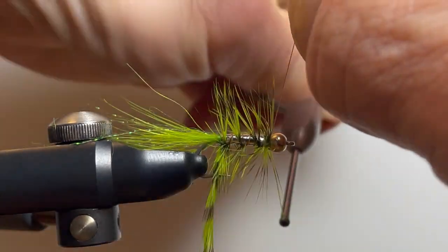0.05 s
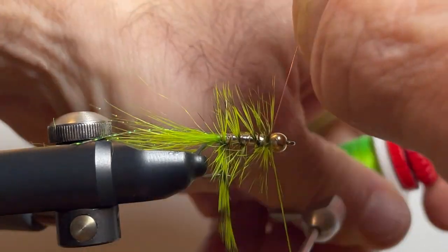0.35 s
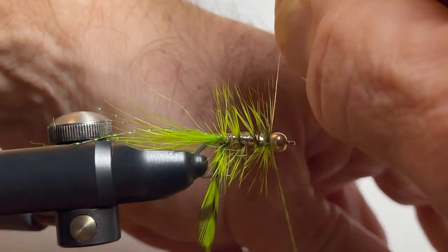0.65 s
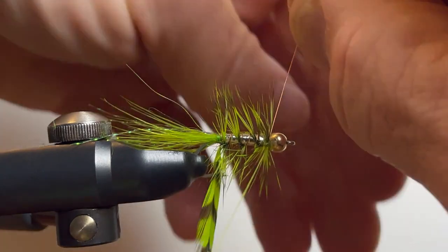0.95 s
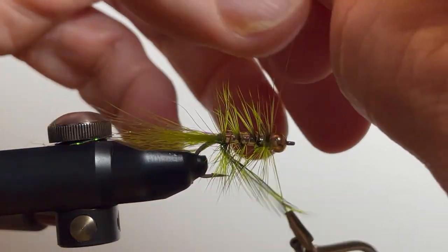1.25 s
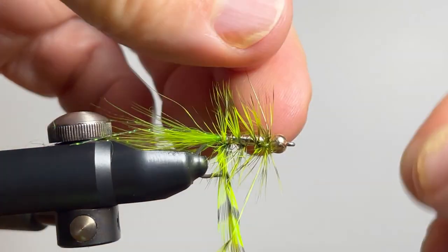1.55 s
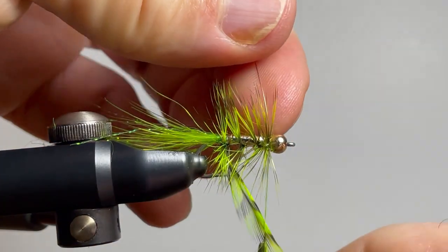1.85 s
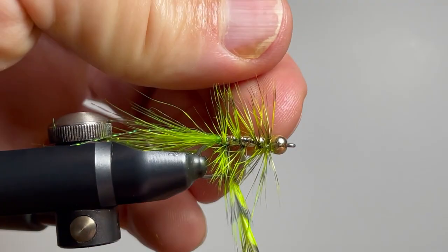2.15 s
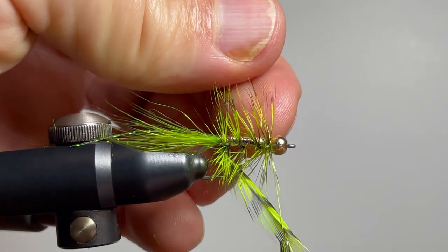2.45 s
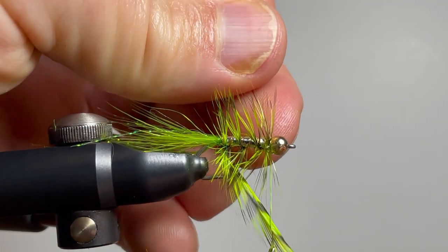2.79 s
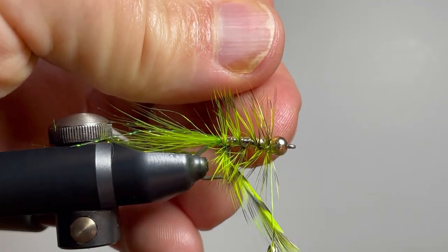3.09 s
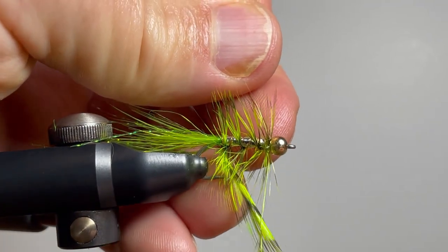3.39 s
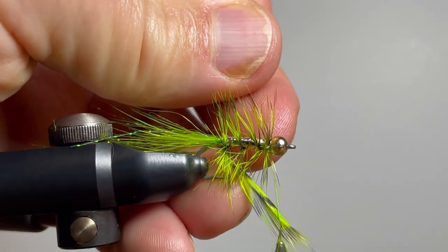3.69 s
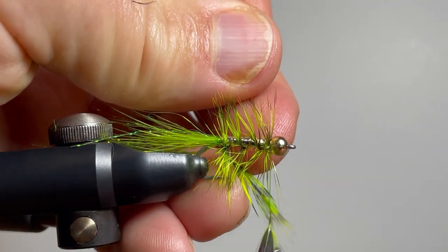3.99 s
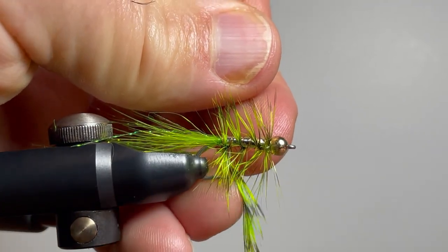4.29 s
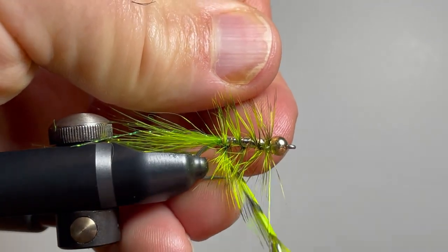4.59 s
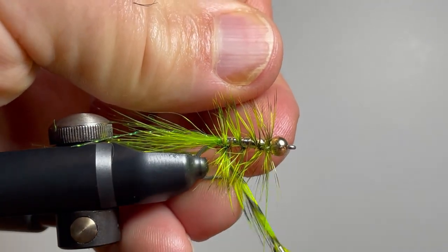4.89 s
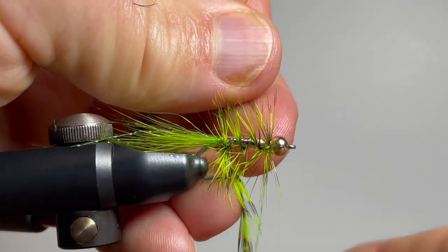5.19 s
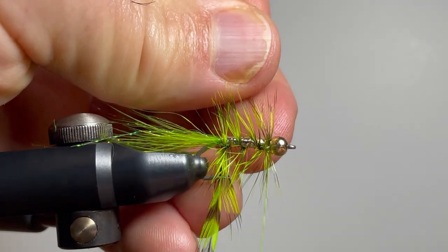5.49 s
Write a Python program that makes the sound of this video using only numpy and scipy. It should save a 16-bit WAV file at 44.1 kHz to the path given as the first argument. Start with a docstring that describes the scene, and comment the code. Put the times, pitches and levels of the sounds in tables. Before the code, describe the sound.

Light, irregular metal ticks and brief scratches come from little pliers knocking against fingers and a vise during fly tying. The jaws clink and the spring sings thinly, while the hand makes a few dull bumps. The handling pauses for about a second midway, then resumes with more clicks, scrapes and clinks. The close stereo microphone also picks up the quiet room's steady low rumble and slight hiss.

```python
"""Small, dry metal ticks and scrapes, close up: steel pliers wind a feather round a fly hook in a vise.
Each touch on fingers or vise is a burst of friction noise that rings the tool's damped resonances.
The jaws clink, and the spring loop sings while the pliers swing free, until a finger catches them.
The hand nudges the vise into soft thuds and brushes the feather once. Two closely spaced microphone
ports hear it all in a quiet room, over a low rumble and a faint hiss."""
import sys
import numpy as np
from scipy import signal
from scipy.fft import rfft, irfft, next_fast_len
from scipy.io import wavfile
from scipy.ndimage import uniform_filter1d

SR = 44100
rng = np.random.default_rng(int(sys.argv[2]) if len(sys.argv) > 2 else 0)


def log_audio(samples):
    """Write samples as a 16-bit WAV file to the path given in sys.argv[1]."""
    # one column per channel
    frames = np.atleast_2d(samples).T
    # limit to full scale, then quantise
    limited = np.clip(frames, -1, 1)
    pcm = np.round(limited * 32767).astype(np.int16)
    wavfile.write(sys.argv[1], SR, pcm)


N = 244490

# dry hits of the pliers: t/s, strength/dB, ping over strength/dB, favoured knock f/Hz, bounce count
TICKS = [(0.776, -31, -1.5, 3000, 0), (0.942, -67, -7, 2200, 0), (1.043, -65.5, -19, 2300, 0),
         (1.09, -42, -7.5, 2200, 0), (1.114, -35.5, -18, 2500, 0), (1.12, -37, 0.5, 3590, 0),
         (1.144, -35, -6, 2270, 0), (1.164, -42.5, 4.5, 2630, 0), (1.205, -47.5, 3, 3405, 0),
         (1.233, -52, 5, 3575, 0), (1.267, -47.5, -12, 3500, 1), (1.505, -45, -5.5, 2674, 0),
         (1.542, -49.5, 4, 3630, 0), (1.678, -62, -16.5, 2387, 0), (1.782, -45.5, -1, 2287, 2),
         (1.8205, -32, 7, 2297, 2), (1.845, -40, 10, 1665, 1), (1.935, -51.5, 2, 3380, 0),
         (2.089, -45, 4, 2140, 0), (2.106, -42.5, -3, 1940, 0), (2.274, -42, 8.5, 1958, 2),
         (2.299, -40.5, 3.5, 1953, 0), (2.342, -37, -27, 2080, 0), (2.366, -44.5, -19, 2090, 0),
         (2.579, -67, -28, 1710, 0), (2.839, -61.5, -17, 2400, 0), (2.858, -59.5, -3.5, 2200, 0),
         (3.782, -44.5, -8.5, 2600, 0), (4.16, -46.5, -6, 2114, 0), (4.17, -42.5, -5, 3200, 0),
         (4.188, -41.5, -11, 2115, 0), (4.237, -43.5, -13, 2500, 0), (4.328, -30, -6, 3210, 0),
         (4.439, -38.5, -6, 1840, 0), (4.47, -46, 5, 1800, 0), (4.541, -48, -2, 1920, 0),
         (4.604, -59, -7, 1995, 0), (4.68, -48.5, -14, 2380, 0), (4.721, -40.5, 11, 3540, 0),
         (4.737, -41.5, 11, 1853, 2), (4.773, -42.5, -6, 1940, 0), (5.09, -46.5, -13.5, 2120, 0),
         (5.128, -46.5, -5, 2590, 0), (5.1441, -32, 4.5, 4090, 0), (5.171, -48.5, 6.5, 1790, 0),
         (5.279, -43.5, -0.5, 1880, 0), (5.503, -30.5, -9, 2040, 0), (5.516, -44.5, 0.5, 3760, 0)]
# scrapes, and the 4.4 kHz ping ringing on after the hard hits near 1.85 s:
# start t/s, end t/s, strength/dB, ping trim/dB
SCRAPES_AND_TAILS = [(1.13, 1.225, -46.5, -11), (1.266, 1.303, -56.5, -17), (1.521, 1.575, -45, -5),
                     (1.791, 1.823, -46, -5.5), (1.844, 1.871, -46.5, 5), (1.873, 1.943, -58, 10),
                     (1.967, 2.016, -62, -4), (2.093, 2.113, -45.5, -1), (2.329, 2.391, -49, -8),
                     (4.161, 4.224, -48.5, -7.5), (4.237, 4.301, -54, -2), (4.4, 4.503, -44.5, -8.5),
                     (4.502, 4.618, -61.5, -2), (4.677, 4.745, -61.5, -19), (5.147, 5.207, -44.5, -5),
                     (5.206, 5.281, -53, -5.5)]
# strikes that ring the jaws: t/s, relative level/dB, share of the free ring time that the grip leaves
CLINKS = [(0.775, -52.5, 1), (1.088, -52.5, .62), (1.168, -45.5, 0.39), (1.506, -55, 0.97), (2.09, -59, 1),
          (2.341, -48, 0.74), (2.858, -71, 0.67), (3.781, -43, 0.95), (4.171, -44.5, 0.92),
          (4.237, -50.5, 1), (4.329, -42.5, 0.54), (5.09, -53, 0.86), (5.128, -45.5, 0.51),
          (5.171, -44, 0.71), (5.277, -51, 0.87), (5.503, -56, 0.61)]
# free swings of the pliers: start t/s, caught t/s, relative level/dB
SWINGS = [(0.773, 1.09, -63.5), (1.173, 1.385, -70), (1.51, 1.7, -65), (5.134, 5.267, -60),
          (5.279, 5.411, -64)]
# hand pushes on the vise: t/s, hold/s, relative level/dB
NUDGES = [(0.801, 0.077, -59.5), (1.102, .1, -48), (1.392, 0.023, -63.5), (1.78, 0.15, -56),
          (1.837, 0.024, -53), (2.03, 0.035, -57), (2.155, 0.18, -64), (2.361, 0.011, -55.5),
          (5.162, 0.052, -57.5)]
# finger on feather: t/s, level/dB
BRUSHES = [(3.958, -67)]
# ringing modes of the steel jaws and of the spring loop: f/Hz, relative level/dB, free t60/s
JAW_MODES = [(2525, -13, .18), (5820, -3, .2), (6670, 0, .24), (6907, -2, .27), (7590, -6, .19),
             (9797, -9, .18), (10095, -9, .34), (11010, -12, .1), (11880, 6, .16), (13340, -13, .14)]
SPRING_MODES = [(3347, 0, 1.05)]
# damped resonances of held tool and vise, in low, middle and high groups: f/Hz, width/Hz, level/dB
KNOCK_MODES = [(437, 71, -2), (1154, 80, -5), (1880, 147, 3), (2114, 53, 9.5), (2370, 370, 3.5),
               (2884, 1400, 0), (3503, 460, 2.5)]
PING_MODES = [(4270, 120, 1.5), (4425, 140, 13), (4569, 302, 9.5), (5130, 470, -1.5)]
SNAP_MODES = [(5740, 520, 3), (6895, 580, 3), (9380, 1400, 2), (10940, 980, 1), (13620, 2400, 1),
              (15100, 1370, -4)]
# noise colours of the bench thud, the room rumble and the hiss: f/Hz, relative level/dB
THUD_SPECTRUM = [(20, -31), (40, -1.5), (80, 9), (125, 3.5), (170, -6.5), (300, -15), (395, -27.5),
                 (434, -4), (490, -33), (700, -20), (1500, -55.5)]
RUMBLE_SPECTRUM = [(12, -57.5), (20, -23.5), (31, -9), (51, -2), (102, -1.5), (127, 0.5), (156, -4.5),
                   (179, -6), (209, -7.5), (240, -6), (356, -16.5), (429, -12), (615, -24), (1200, -35.5),
                   (1560, -66), (2640, -120)]
HISS_SPECTRUM = [(400, -28.5), (1000, -1.5), (2500, -3), (6000, -10), (9000, -19), (12500, -13.5),
                 (15000, -26.5)]
# decay of the room tail: f/Hz, t60/s
ROOM_DECAY = [(200, 0.13), (2000, .3), (4500, 0.26), (8000, 0.2), (15000, 0.17)]
# stereo width of the room tail: f/Hz, side over mid level/dB
ROOM_WIDTH = [(400, 0), (1200, -2), (1700, 3), (2300, -19), (4500, -29.5), (7400, -4), (10000, -11.5),
              (14000, -9)]
# likeness of the room tone at the two ports: f/Hz, left-right correlation
ROOM_COHERENCE = [(40, 1), (120, .9), (300, 0.82), (700, 0.26), (2000, 0.29), (8000, 0.2)]
# phase between the ports: f/Hz, left lead/rad
PORT_PHASE = [(0, 0), (4000, 0), (4900, .35), (6900, -.8), (7850, -2.85), (8600, -3.45), (10000, -4.95),
              (10700, -5.9), (12300, -6.6), (13100, -7.8), (14900, -9.4), (16000, -9.5)]
# balance between the ports: f/Hz, left over right level/dB
PORT_TILT = [(30, 1.5), (200, 1.5), (2200, 1.5), (4000, 0)]


def ticks(span_s=0.005, t60=0.012, rise_s=0.0006, favour_db=8, favour_octaves=0.16):
    """Hits chatter and may bounce; harder ones are brighter, and the contact point colours each."""
    out, t = np.zeros(N), np.arange(SR // 6) / SR
    bounce_s, bounce_loss_db, bounce_dull_db = 0.0092, 0.5, 5
    medium_db, medium_knock_db, knock_slope = -42, -52.5, 0.91  # the knock grows slower than the top
    for start, strength, ping, knock_hz, bounces in TICKS:
        snap_hz = 7520 * 2 ** (0.3 * rng.standard_normal())  # scattered by 0.3 octave

        def colour(hz):
            distances = [np.log2((hz + 1) / centre) / favour_octaves for centre in (knock_hz, snap_hz)]
            return amp(favour_db * sum(np.exp(-d ** 2) for d in distances))

        for k in range(round(bounces) + 1):
            level = strength - k * bounce_loss_db
            knock = medium_knock_db + knock_slope * (level - medium_db)
            levels = (knock, level + ping - k * bounce_dull_db, level)
            chatter = rng.standard_normal(len(t)) * amp(-60 * t / t60) * (1 - np.exp(-t / rise_s))
            add(out, start + k * bounce_s, contact(filtered(chatter, colour), levels, span_s))
    return out


def scrapes_and_tails(slips_per_s=300, slip_t60=0.025, slip_spread_db=3, drag=0.45, fade_db=5):
    """A scrape is a fading run of tiny slips over drag; with the ping up, it voices a hit's ring tail."""
    out, t = np.zeros(N), np.arange(SR // 4) / SR
    for start, end, strength, ping in SCRAPES_AND_TAILS:
        length = end - start
        slips = (rng.random(len(t)) < slips_per_s / SR) * amp(slip_spread_db * rng.standard_normal(len(t)))
        grip = drag + signal.fftconvolve(slips, amp(-60 * t / slip_t60))[:len(t)]
        release = amp(-fade_db * t / length) * (t < length)
        force = glints(rng.standard_normal(len(t)), depth_db=4) * grip * release
        levels = strength + np.array([-10, ping - 1, -4])  # knock, ping, snap
        add(out, start, contact(force, levels, length))
    return out


def glints(x, depth_db):
    """Random sparkle in patches a few hundred hertz wide and a few milliseconds long."""
    bins = signal.stft(x, nperseg=256)[2]
    patches = uniform_filter1d(rng.standard_normal(bins.shape), size=4, axis=0)
    patches = uniform_filter1d(patches, size=2, axis=1)
    return signal.istft(bins * amp(depth_db * unit(patches)), nperseg=256)[1][:len(x)]


def contact(force, levels_db, length_s):
    """A touch rings knock, ping and snap, each with the energy of its level held for length_s."""
    groups = [resonate(force, KNOCK_MODES, low_hz=308), resonate(force, PING_MODES, low_hz=4210),
              resonate(force, SNAP_MODES, low_hz=5750)]
    return sum(amp(db) * group * np.sqrt(length_s * SR / (np.sum(group ** 2) + 1e-20))
               for db, group in zip(levels_db, groups))


def resonate(force, modes, low_hz):
    """A force rings damped resonances of alternating polarity; little radiates below low_hz."""
    def body(f):
        peaks = sum((-1) ** k * amp(db) * 1j * f * width / (hz * hz - f * f + 1j * f * width)
                    for k, (hz, width, db) in enumerate(modes))
        top_hz = 2.3 * modes[-1][0]
        return peaks / (1 + (f / top_hz) ** 4)

    low_cut = signal.butter(4, low_hz, "high", fs=SR, output="sos")
    return signal.sosfilt(low_cut, filtered(force, body))


def clinks(trim_db=-2, tilt_db_per_octave=-3.5):
    """The struck jaws ring briefly; the firmer the grip, the shorter."""
    out = np.zeros(N)
    for start, level, free in CLINKS:
        jaws = [(hz, db + tilt_db_per_octave * np.log2(hz / 7000), t60 * free)
                for hz, db, t60 in JAW_MODES]
        add(out, start, amp(level + trim_db) * ring(jaws))
    return out


def jaw_shimmer(drive, relative_db=-12, ring_share=0.4):
    """Scrapes and ping tails keep the gripped jaws faintly ringing."""
    gripped = ring([(hz, db, t60 * ring_share) for hz, db, t60 in JAW_MODES])
    steel = signal.fftconvolve(drive, gripped)[:N]
    return amp(relative_db) * np.std(drive) * unit(steel)


def spring(trim_db=-1, catch_t60=0.149):
    """The spring loop sings on while the pliers swing, until a finger damps it."""
    out, t = np.zeros(N), np.arange(SR) / SR
    for start, caught, db in SWINGS:
        damping = amp(-60 * np.maximum(start + t - caught, 0) / catch_t60)
        add(out, start, amp(db + trim_db) * damping * ring(SPRING_MODES))
    return out


def ring(modes, rise_s=0.00015):
    """Steel modes die away as sines, struck at slightly new strengths each time."""
    t = np.arange(SR) / SR
    tones = sum(amp(db + rng.standard_normal() - 60 * t / t60)
                * np.sin(2 * np.pi * (hz * t + rng.random())) for hz, db, t60 in modes)
    return tones * (1 - np.exp(-t / rise_s))


def nudges(trim_db=2.5, attack_s=0.02, release_s=0.04):
    """Soft pushes of the hand swell, hold and let go; they make the vise and bench thud."""
    t = np.arange(N) / SR
    push = sum(amp(db) * np.interp(t, [s - attack_s, s, s + hold, s + hold + release_s], [0, 1, 1, 0])
               for s, hold, db in NUDGES)
    thud = filtered(rng.standard_normal(N), lambda hz: amp(along(THUD_SPECTRUM, hz)))
    return amp(trim_db) * push * unit(thud)


def feather_brush(width_s=0.013, top_hz=2600):
    """Skin on feather: a dull swell of noise."""
    t = np.arange(N) / SR
    swell = sum(amp(db) * np.exp(-((t - s) / width_s) ** 2) for s, db in BRUSHES)
    dull = lambda hz: 1 / np.sqrt(1 + hz / 300) / (1 + (hz / top_hz) ** 6)
    return swell * unit(filtered(rng.standard_normal(N), dull))


def room_tail(x):
    """A short reverb from bench and walls, largely shared by the two ports."""
    hz, t, bins = signal.stft(rng.standard_normal((2, SR // 2)), SR, nperseg=256)
    decay = amp(-60 * t / along(ROOM_DECAY, hz)[:, None])
    mid, side = signal.istft(bins * decay, SR, nperseg=256)[1]
    side = filtered(side, lambda f: amp(along(ROOM_WIDTH, f)))
    tail = np.array([mid + side, mid - side])
    return signal.fftconvolve(x[None], tail / np.linalg.norm(tail[0]), axes=1)[:, :N]


def ports(pair):
    """Sound from the bench reaches the two ports with different phases."""
    lead = lambda hz: np.interp(hz, *np.transpose(PORT_PHASE))
    return filtered(pair, lambda hz: np.exp(1j * lead(hz) * np.array([[.5], [-.5]])))


def room_tone(spectrum):
    """A steady bed of stereo noise at rms 1, nearly mono in the bass."""
    def mid_side_gains(hz):
        angle = np.arccos(along(ROOM_COHERENCE, hz)) / 2
        return amp(along(spectrum, hz)) * [np.cos(angle), np.sin(angle)]

    mid, side = filtered(rng.standard_normal((2, N)), mid_side_gains)
    return unit(np.array([mid + side, mid - side]))


def amp(db):
    """Decibels to gain."""
    return 10 ** (np.asarray(db) / 20)


def unit(x):
    """Scale to rms 1."""
    return x / np.sqrt(np.mean(x ** 2) + 1e-20)


def along(points, hz):
    """Read a curve of (f/Hz, value) points on a log frequency axis."""
    f, values = np.transpose(points)
    return np.interp(np.log(hz + 1), np.log(f + 1), values)


def filtered(x, response):
    """Equalise x with a complex response of frequency."""
    n = x.shape[-1]
    padded = next_fast_len(n + 8192)
    return irfft(rfft(x, padded) * response(np.fft.rfftfreq(padded, 1 / SR)), padded)[..., :n]


def add(track, start_s, sound):
    """Mix a sound into the track from start_s on."""
    part = track[round(start_s * SR):][:len(sound)]
    part += sound[:len(part)]


def scene(wet_db=-11.5):
    """The pliers up front with a touch of room, thuds beneath, rumble and hiss behind."""
    sustained = scrapes_and_tails()
    tool = ticks() + sustained + jaw_shimmer(sustained) + clinks() + spring() + feather_brush()
    near = ports(tool + amp(wet_db) * room_tail(tool)) + nudges()
    return near + amp(-63) * room_tone(RUMBLE_SPECTRUM) + amp(-83.5) * room_tone(HISS_SPECTRUM)


def record(dry, top_hz=16300):
    """The left port is a little stronger in the lows and mids; nothing passes above top_hz."""
    tilted = filtered(dry, lambda hz: amp(along(PORT_TILT, hz) * np.array([[.5], [-.5]])))
    return filtered(tilted, lambda hz: hz < top_hz)


dry = scene()
out = record(dry)
log_audio(out)
```